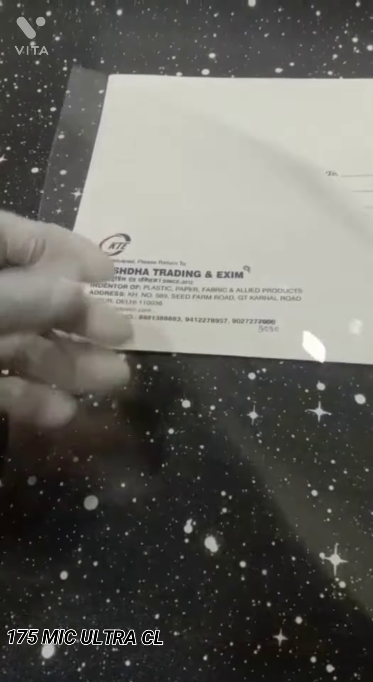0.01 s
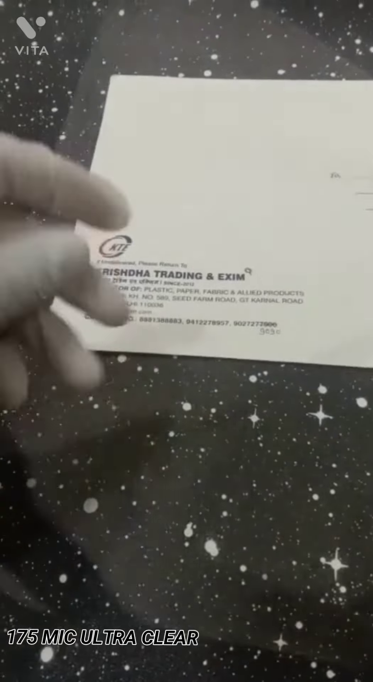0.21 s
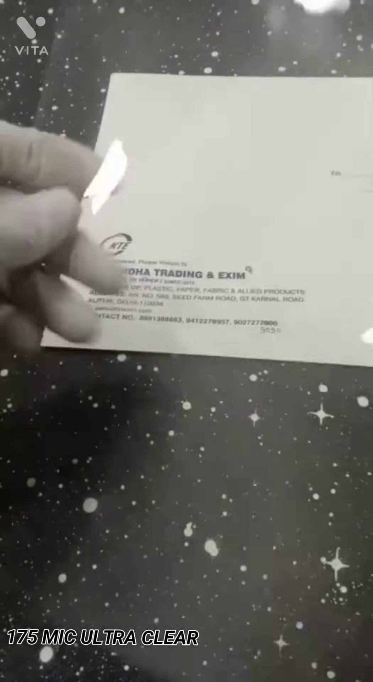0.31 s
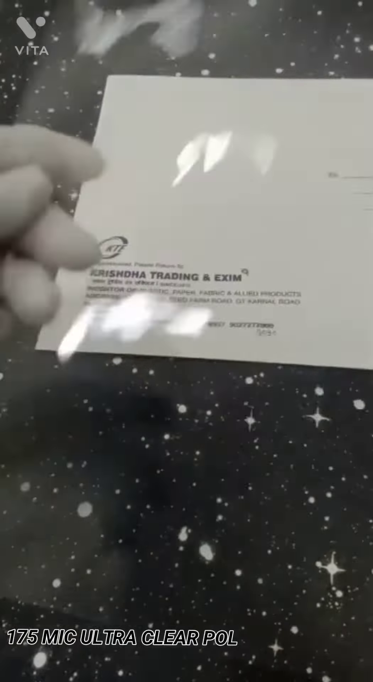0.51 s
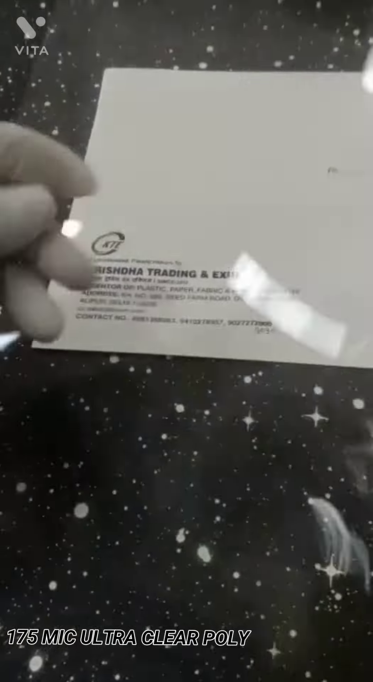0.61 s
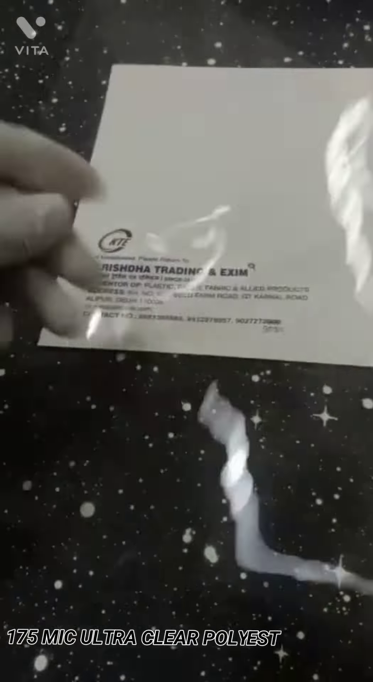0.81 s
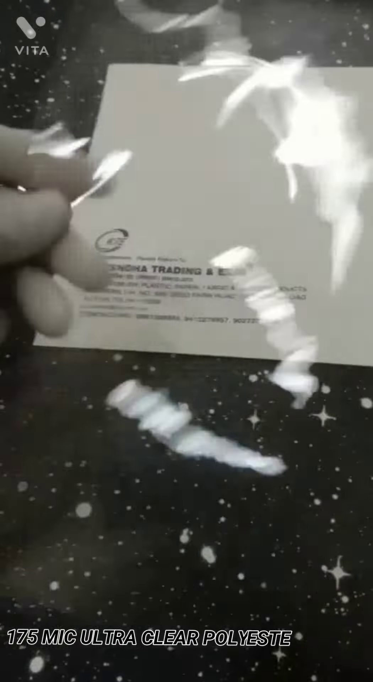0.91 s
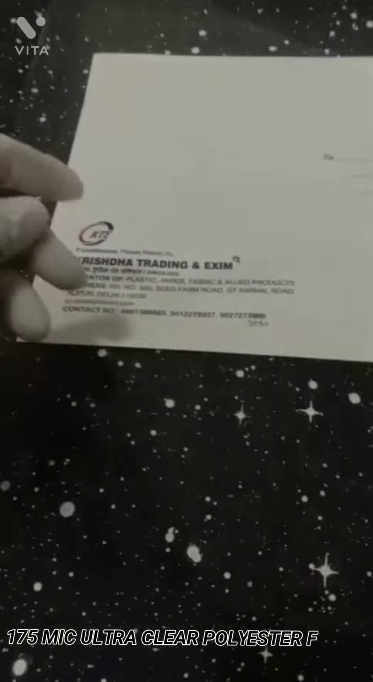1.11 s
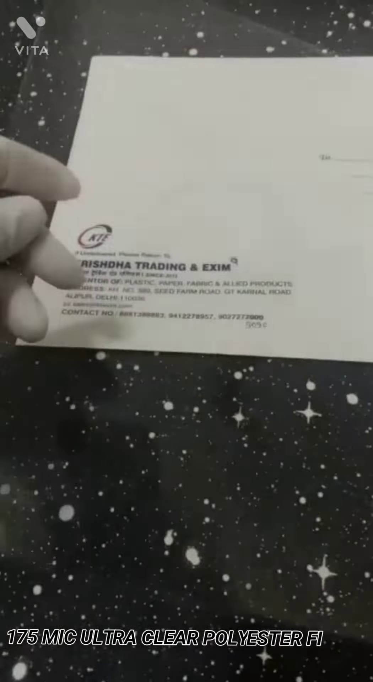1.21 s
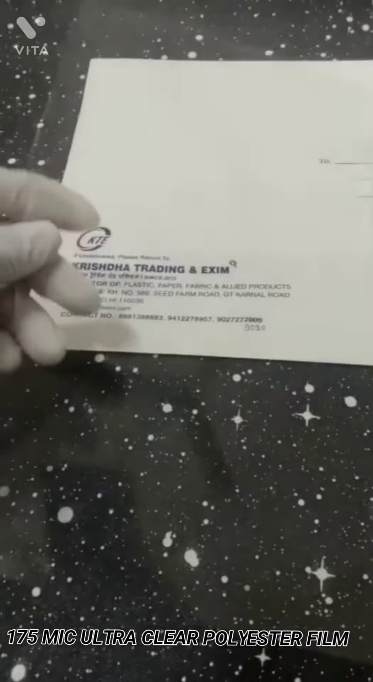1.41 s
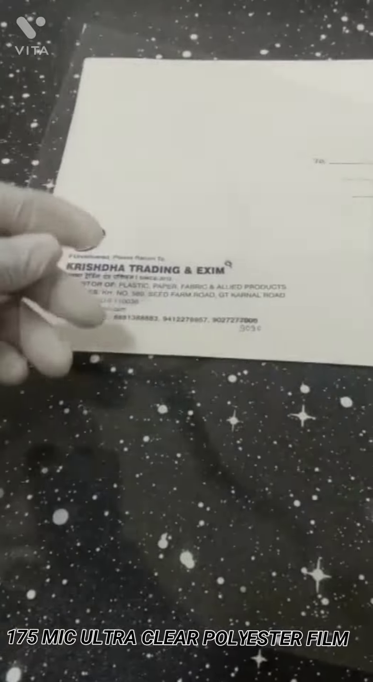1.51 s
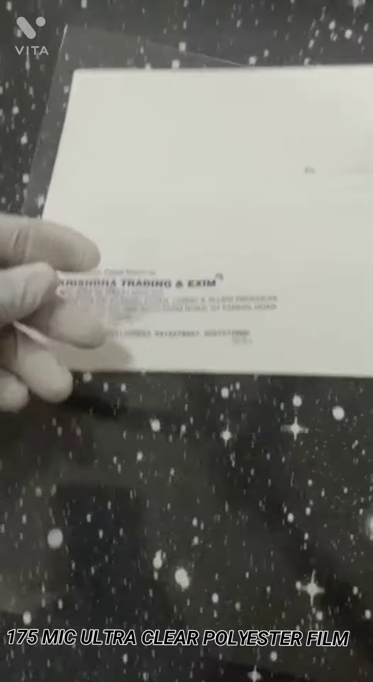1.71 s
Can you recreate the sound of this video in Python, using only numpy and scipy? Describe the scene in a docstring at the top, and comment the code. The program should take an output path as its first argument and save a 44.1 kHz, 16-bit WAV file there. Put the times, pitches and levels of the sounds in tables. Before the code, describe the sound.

Stiff plastic sheet handled close to a phone microphone in a bare, echoing room. Quiet low rumble and a faint glove slide until 0.2 s, then a sharp snap and hollow buckling near 0.25 and 0.4 s. Brighter, denser cracks and snaps come from 0.55 to 1.2 s, loudest around 0.75 to 0.85, with rustle between. After 1.3 s it fades through echo to soft thuds and faint hiss.

```python
"""A gloved hand flexes a stiff clear plastic sheet close to a phone microphone in a bare, echoing room.
Room rumble runs throughout; narrow hiss bands, as of the glove sliding, open it, and soft thuds follow.
From 0.2 to 1.2 s the sheet buckles in flurries of cracks with sharp snaps, rustling on in between.
Close resonances, one near 1.25 kHz, and the echo shape it; then the rustle settles over faint hiss."""
import sys
import numpy as np
from scipy import signal
from scipy.fft import rfft, irfft
from scipy.io import wavfile
from scipy.ndimage import uniform_filter1d, minimum_filter1d

SR = 44100
rng = np.random.default_rng(int(sys.argv[2]) if len(sys.argv) > 2 else 0)


def persist_wave(psi):
    """Save psi, clipped to +-1, as 16-bit WAV."""
    counts = np.round(np.clip(psi, -1, 1) * 32767).astype(np.int16)
    wavfile.write(sys.argv[1], SR, np.atleast_2d(counts).T)


N = 79380


def from_db(db):
    """Amplitude ratio of a level in dB."""
    return 10 ** (np.asarray(db) / 20)


def rms_one(x):
    """Scale to rms 1."""
    return x / np.sqrt(np.mean(x ** 2) + 1e-20)


def at_hz(points, hz):
    """Read a (Hz, value) table, linear in log frequency."""
    table = np.array(points)
    return np.interp(np.log(np.maximum(hz, 1)), np.log(table[:, 0]), table[:, 1])


def drift(rate_hz):
    """Slow random signal, rms 1: noise through two equal poles at rate_hz."""
    pole = np.exp(-2 * np.pi * rate_hz / SR)
    noise = rng.standard_normal(N + SR)
    settled = signal.lfilter([1], [1, -2 * pole, pole * pole], noise)[SR:]
    return rms_one(settled)


def colour(x, spectrum):
    """Causal minimum-phase filter following a spectrum table, built by folding its cepstrum."""
    size = 8192
    log_gain = at_hz(spectrum, np.fft.rfftfreq(size, 1 / SR)) * np.log(10) / 20
    cepstrum = irfft(log_gain)
    cepstrum[1:size // 2] *= 2
    cepstrum[size // 2 + 1:] = 0
    impulse = irfft(np.exp(rfft(cepstrum)))[:size // 2]
    return signal.fftconvolve(x, impulse)[:len(x)]


# rumble and hiss spectrum, relative: f/Hz, density/dB per Hz
RUMBLE_SPECTRUM = [(15, -27.5), (45, -26.5), (134, 2), (236, -8.5), (911, -16), (1230, -12), (1790, -38),
                   (5280, -35), (6740, -61.5), (16000, -52)]
RUMBLE_DB, RUMBLE_SWELL_RMS_DB, RUMBLE_SWELL_HZ = -60, 5, 3.1


def rumble():
    """Low background: coloured noise that swells unevenly."""
    noise = rms_one(colour(rng.standard_normal(N + SR), RUMBLE_SPECTRUM)[SR:])
    return from_db(RUMBLE_DB + RUMBLE_SWELL_RMS_DB * drift(RUMBLE_SWELL_HZ)) * noise


# room decay: f/Hz, t60/s
ROOM_DECAY = [(200, 1.37), (1200, 1.085), (3000, 0.88), (6000, 0.41), (12000, 0.39)]
ROOM_DB, ROOM_ONSET_S = -8.5, 0.0032


def room(x):
    """Diffuse echo: noise dying away at its own rate in each half octave."""
    t = np.arange(N) / SR
    edges_hz = 60 * 2 ** np.arange(0, 8.6, .5)
    white = rng.standard_normal((2, N))
    tail = 0
    for k, (low, high) in enumerate(zip(edges_hz, np.minimum(edges_hz[1:], .45 * SR))):
        sos = signal.butter(2, [low, high], "band", fs=SR, output="sos")
        band = signal.sosfilt(sos, white[k % 2])
        tail = tail + band * from_db(-60 * t / at_hz(ROOM_DECAY, np.sqrt(low * high)))
    # silent up to the onset time, full at twice that
    tail = tail * np.clip(t / ROOM_ONSET_S - 1, 0, 1)
    unit_tail = tail / np.sqrt(np.sum(tail ** 2))
    return from_db(ROOM_DB) * signal.fftconvolve(x, unit_tail)[:N]


# soft low thuds: t/s, peak level/dB, f/Hz
THUD_EVENTS = [(.09, -49, 118.6), (0.22, -41.5, 91), (.31, -48.5, 85), (0.412, -45, 110), (.93, -42, 123),
               (1.085, -48, 118), (1.18, -43.5, 108.4), (1.265, -47, 125), (1.57, -49, 110),
               (1.628, -44, 125), (1.684, -50, 120), (1.749, -53, 130)]
THUD_LENGTH_S = 0.039


def thuds():
    """A few rounded low cycles each: a sine under a raised hump."""
    t, out = np.arange(N) / SR, 0
    phases = rng.uniform(0, 2 * np.pi, len(THUD_EVENTS))
    for (start_s, db, hz), phase in zip(THUD_EVENTS, phases):
        hump = np.sin(np.pi * np.clip((t - start_s) / THUD_LENGTH_S, 0, 1)) ** 2
        out = out + from_db(db) * hump * np.sin(2 * np.pi * hz * t + phase)
    return out


# faint hiss bands, as of the glove sliding: t/s, length/s, f/Hz, width per filter pass/Hz, level/dB
SLIDE_EVENTS = [(0.01, 0.17, 3670, 310, -65.5), (0.027, 0.29, 950, 397, -51.5),
                (0.172, 0.056, 4470, 900, -56), (1.572, 0.1, 2280, 505, -50), (1.587, 0.08, 5970, 704, -64),
                (1.595, 0.2, 5330, 450, -73)]


def slides():
    """Noise twice through a narrow resonance, swelling and fading."""
    t, out = np.arange(N) / SR, 0
    for start_s, length_s, hz, width_hz, db in SLIDE_EVENTS:
        b, a = signal.iirpeak(hz, hz / width_hz, fs=SR)
        noise = rng.standard_normal(N)
        hiss = rms_one(signal.lfilter(b, a, signal.lfilter(b, a, noise)))
        swell = np.sin(np.pi * np.clip((t - start_s) / length_s, 0, 1))
        out = out + from_db(db) * swell * hiss
    return out


def clicks(per_s, spread_db):
    """Random clicks of uneven size and sign; rms 1."""
    sizes = from_db(spread_db * np.minimum(rng.exponential(1, N), 4))
    signed = sizes * rng.choice([-1, 1], N)
    return rms_one(signed * (rng.random(N) < per_s / SR))


# spectrum of sheet and microphone, relative: f/Hz, density/dB per Hz
SHEET_SPECTRUM = [(35, -56), (60, -35), (250, -24), (380, -18), (862, -14), (1250, -4.5), (1620, -10),
                  (2410, -13), (3270, -12), (4750, -15), (6300, -18), (8120, -38.5), (9570, -37.5),
                  (16000, -60)]
# centres of the lows, reference, mids, treble and top bands: f/Hz
BAND_HZ = [400, 1200, 2400, 5000, 10000]
FACET_Q_AT_1KHZ = 3.48   # per filter pass; grows with the root of pitch
FACET_WANDER_RMS_DB, FACET_WANDER_HZ = 1.5, 12


def sheet(train, gains):
    """Clicks ring small facets, each at its own pitch, its level wandering at random; band gains blend."""
    pitches = np.geomspace(90, 16500, num=56) * rng.uniform(.97, 1.03, size=56)
    place = np.interp(np.log(pitches), np.log(BAND_HZ), np.arange(len(gains)))
    nearest_band = np.round(place)
    stream = rng.integers(0, 8, N)   # clicks dealt to 8 groups of facets
    power = pitches * from_db(2 * at_hz(SHEET_SPECTRUM, pitches))
    gains = [gain / np.sqrt(power[nearest_band == j].sum()) for j, gain in enumerate(gains)]
    out = 0
    for k, hz in enumerate(pitches):
        b, a = signal.iirpeak(hz, FACET_Q_AT_1KHZ * np.sqrt(hz / 1000), fs=SR)

        def ring(x):
            """Two passes through the facet's resonance."""
            return signal.lfilter(b, a, signal.lfilter(b, a, x + 1e-18))

        hits = train * (stream == k % 8)
        below = min(int(place[k]), len(gains) - 2)
        share = place[k] - below
        gain = gains[below] ** (1 - share) * gains[below + 1] ** share
        wander = from_db(FACET_WANDER_RMS_DB * drift(FACET_WANDER_HZ))
        out = out + np.sqrt(hz) / np.std(ring(hits)) * ring(hits * gain * wander)
    return colour(out, SHEET_SPECTRUM)


# rustle of the bent sheet: t/s, level before trim/dB, then relative to it: lows/dB, mids/dB, treble/dB, top/dB
RUSTLE_LEVELS = [(0, -64.5, -7, -15, -14.5, -17), (.07, -50, -13, -24, -22.5, -25.5),
                 (0.171, -55.5, 1.5, -31, -27.5, -27.5), (0.219, -35, -18.5, -7.5, -24.5, -40.5),
                 (.35, -25.5, -11.5, -7, -25.5, -58), (0.518, -29.5, -7.5, -10, -36.5, -63),
                 (0.599, -24.5, -11.5, 4, -13.5, -56), (.71, -22.5, -8, -3.5, -16, -37.5),
                 (0.839, -36.5, -19, -14.5, -15, -40), (0.879, -24, -12.5, 3.5, -13.5, -23),
                 (1.151, -19.5, -13, -6.5, -14, -39), (1.301, -25, -10, -6.5, -16, -50),
                 (1.47, -39, -17.5, -7.5, -19.5, -54), (1.8, -56, -15, -26, -13, -42)]
TICKS_PER_S, TICK_SPREAD_DB = 20000, 2.5
RUSTLE_TRIM_DB, RUSTLE_FLUTTER_RMS_DB, RUSTLE_FLUTTER_HZ = -7, 1.0, 37.0


def rustle():
    """Dense small ticks on the facets, their level fluttering."""
    times_s, *columns = np.transpose(RUSTLE_LEVELS)
    t = np.arange(N) / SR
    db, low_db, *high_db = [np.interp(t, times_s, column) for column in columns]
    db = db + RUSTLE_TRIM_DB + RUSTLE_FLUTTER_RMS_DB * drift(RUSTLE_FLUTTER_HZ)
    gains = [from_db(db + relative_db) for relative_db in [low_db, 0, *high_db]]
    return sheet(clicks(TICKS_PER_S, TICK_SPREAD_DB), gains)


# single sharp snaps: t/s, peak level before close resonances/dB, f/Hz
SNAP_EVENTS = [(0.2364, -5, 1450), (.245, -15.5, 5530), (.432, -20.5, 1420), (.580, -18, 3600),
               (0.626, -15.5, 4400), (0.7363, -0.5, 2160), (.7378, -23.5, 3500), (0.767, -5, 2300),
               (0.7995, -20, 3640), (0.8491, -7, 4160), (0.8572, -2.5, 2620), (.936, -19, 3800),
               (.966, -12, 4500), (1.011, -8.5, 4600), (1.15, -10.5, 2700)]
SNAP_Q = 2.7


def snaps():
    """One click each, ringing a few cycles."""
    out, click = np.zeros(N + 2000), np.eye(1, 2000)[0]
    signs = rng.choice([-1, 1], len(SNAP_EVENTS))
    for (start_s, db, hz), sign in zip(SNAP_EVENTS, signs):
        b, a = signal.iirpeak(hz, SNAP_Q, fs=SR)
        pulse = colour(signal.lfilter(b, a, click), SHEET_SPECTRUM)
        out[int(start_s * SR):][:len(pulse)] += sign * from_db(db) * pulse / np.abs(pulse).max()
    return out[:N]


# buckles: t/s, level before trim/dB, then relative to it: lows/dB, mids/dB, treble/dB, top/dB;
# rise (0.1 at least)/ms, hold/ms
BUCKLE_EVENTS = [(0.09, -46.5, -6.5, -31.5, -23.5, -26.5, 1.7, 13.5),
                 (0.196, -29, -8, -26.5, -26.5, -35.5, 8.2, 5.7),
                 (0.2075, -28.5, -18, -7, -35.5, -41, 0.82, 8.6),
                 (0.217, -26, -8, -7.5, -40.5, -54.5, 3.6, 9.2),
                 (0.2358, -12, -13, -9, -15, -56.5, 0.51, 8), (0.242, -30.5, 1.5, 1.5, -14, -35, 1, 7),
                 (0.2503, -23, -8, 5, -20.5, -59.5, 1.8, 8.6), (0.264, -21, -9.5, -6, -34, -57, 1.5, 13),
                 (0.369, -14, -8, -8, -36, -61, 6.4, 1.9),
                 (0.38, -13.5, -25, -10.5, -46.5, -76.5, 0.67, 7.3),
                 (0.383, -18.5, -13.5, -15.5, -49.5, -67, 3.3, 5.4),
                 (0.426, -22, -12.5, 2, -20, -76.5, 3.5, 8.7),
                 (0.439, -22.5, -17.5, 2, -29, -76.5, 3.3, 18.2),
                 (0.538, -14.5, -15, -10, -20, -62.5, 7.3, 10.1),
                 (0.551, -19, -32.5, -16.5, -15, -57.5, 1.5, 3.6),
                 (0.558, -24, -27.5, 5.5, -3.5, -37.5, 4.9, 2.6),
                 (0.575, -10, -34, -14.5, -8.5, -46, 1.3, 13.9),
                 (0.625, -27, 2.5, -1, 10.5, -49.5, 0.84, 1.04), (0.632, -29, 5, 14, -3.5, -43, 3.9, 4.6),
                 (0.648, -26, -7, 6, -5.5, -54.5, 4.2, 6.9), (0.732, -14.5, -19, 1, -1, -34.5, 1.94, 2.25),
                 (0.738, -19.5, -12.5, 4, -11.5, -29, 1.5, 7.4),
                 (0.7594, -24, -23, 17, -2.5, -20.5, 0.27, 2.2),
                 (0.764, -14, -23.5, 1.5, -6, -32.5, 0.92, 9.1),
                 (0.79, -19, -29.5, 1.5, -3, -46.5, 4.1, 5.1),
                 (0.799, -23, -25.5, -6, -25.5, -48.5, 0.78, 15),
                 (0.848, -16.5, -21.5, 6, 5, -4, 0.26, 0.41),
                 (0.8525, -22.5, -14, 1.5, -18, -16.5, 0.95, 2.7),
                 (0.8566, -23, -7.5, 20.5, 12.5, -9.5, 0.086, 0.25),
                 (0.924, -15, -19, -12, -4.5, -38, 6.1, 8.9), (0.963, -27, -7, -2, 6, -24.5, 0.54, 6.3),
                 (0.978, -18, -26, -2, -19.5, -40, 7.4, 8.7),
                 (0.994, -14.5, -29, -2.5, -16.5, -42, 1.5, 4.1), (1.009, -26, -35, 10.5, 1, -26, 1.7, 2),
                 (1.03, -34.5, -30.5, 16, 2.5, -43, 1.1, 11.4),
                 (1.084, -23.5, -34, -3.7, -11.5, -43.5, 1, 19),
                 (1.146, -22, -6.5, -3.5, -22.5, -33, 1.5, 10),
                 (1.163, -24, -17, -8.5, -31.5, -39.5, 0.5, 39)]
CRACKS_PER_S, CRACK_SPREAD_DB, BUCKLE_TRIM_DB = 12000, 3.2, -2.5
RELEASE_MS, RELEASE_PER_HOLD = 4.66, 0.59   # time to lose 20 dB: base plus share of hold


def buckles():
    """Each buckle swells, holds and dies away as a flurry of cracks on the facets."""
    ms = np.arange(N) / SR * 1000
    gains = np.full((5, N), 1e-9)
    for start_s, db, low_db, mid_db, treble_db, top_db, rise_ms, hold_ms in BUCKLE_EVENTS:
        age_ms = ms - start_s * 1000
        rise = np.clip(age_ms / max(rise_ms, .1), 0, 1) ** 2
        release_ms = RELEASE_MS + RELEASE_PER_HOLD * hold_ms
        release = .1 ** (np.maximum(age_ms - rise_ms - hold_ms, 0) / release_ms)
        relative_db = np.array([[low_db], [0], [mid_db], [treble_db], [top_db]])
        gains += from_db(db + BUCKLE_TRIM_DB + relative_db) * (rise * release)
    return sheet(clicks(CRACKS_PER_S, CRACK_SPREAD_DB), gains)


PEAK_WANDER_MAX_SHARE, PEAK_WANDER_HZ = .02, 6


def wandering_peak(x, hz, width_hz):
    """A narrow resonance whose centre drifts slightly at random, stepped in short blocks."""
    out, state, step = np.zeros(N), np.zeros(2), 512
    centres_hz = hz * (1 + PEAK_WANDER_MAX_SHARE * np.tanh(drift(PEAK_WANDER_HZ)))
    for i in range(0, N, step):
        b, a = signal.iirpeak(centres_hz[i], hz / width_hz, fs=SR)
        out[i:i + step], state = signal.lfilter(b, a, x[i:i + step], zi=state)
    return out


# close resonances: mean f/Hz, width/Hz, lift/dB
CLOSE_PEAKS = [(1268, 85, 4.5), (2300, 320, 4), (3600, 200, 3.5), (10060, 1100, 1), (15000, 550, 11)]
ROOM_PEAK_SHARE = .3   # share of the close resonances that reaches the room


def scene():
    """The sheet close up, its echo in the room, and the background."""
    film = buckles() + snaps() + rustle()
    near = film
    for hz, width_hz, lift_db in CLOSE_PEAKS:
        near = near + (from_db(lift_db) - 1) * wandering_peak(near, hz, width_hz)
    echo = room(film + ROOM_PEAK_SHARE * (near - film))
    return (near + echo + rumble() + thuds() + slides())[None]


LIMIT, LIMITER_MS = .86, 3
CUTOFF_HZ = 16900   # 70 dB down from here up


def record(dry):
    """A quick look-ahead limiter holds the peaks, then a steep low-pass cuts the top."""
    size = int(LIMITER_MS * SR / 1000)
    need = np.minimum(1, LIMIT / (np.abs(dry) + 1e-9))
    held = minimum_filter1d(need, size=2 * size)
    gain = uniform_filter1d(uniform_filter1d(held, size=size), size=size)
    low_pass = signal.cheby2(12, 70, CUTOFF_HZ, fs=SR, output="sos")
    return signal.sosfilt(low_pass, dry * gain)


dry = scene()
out = record(dry)
persist_wave(out)
```